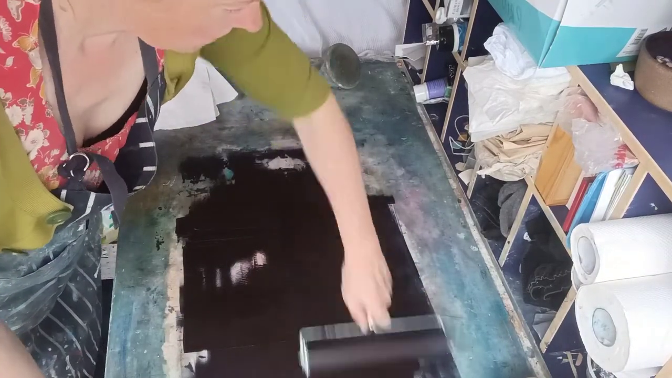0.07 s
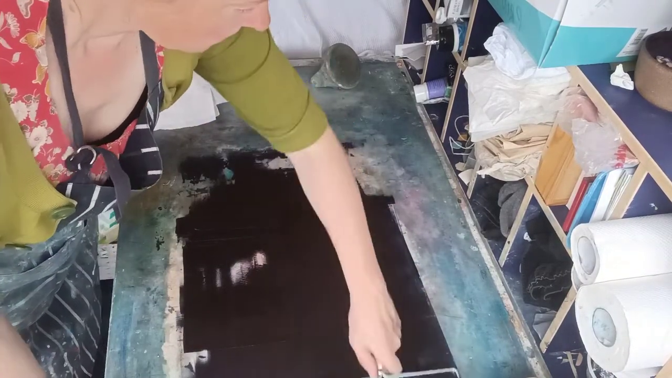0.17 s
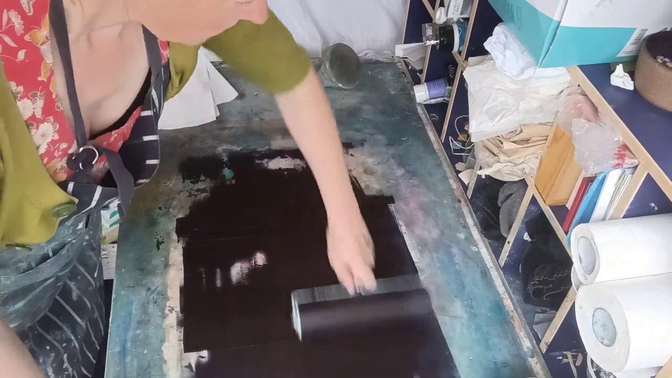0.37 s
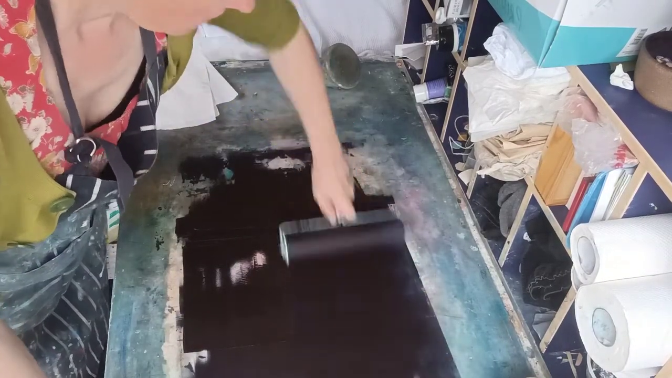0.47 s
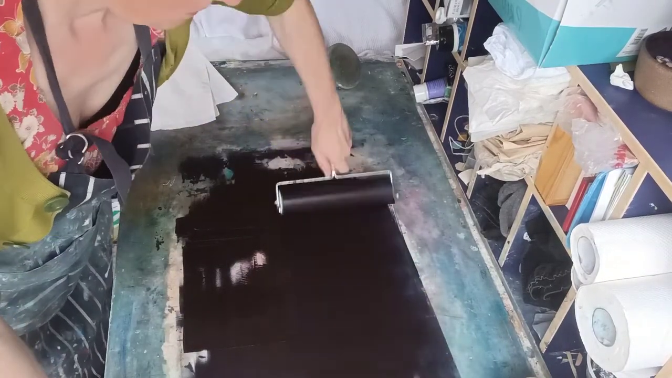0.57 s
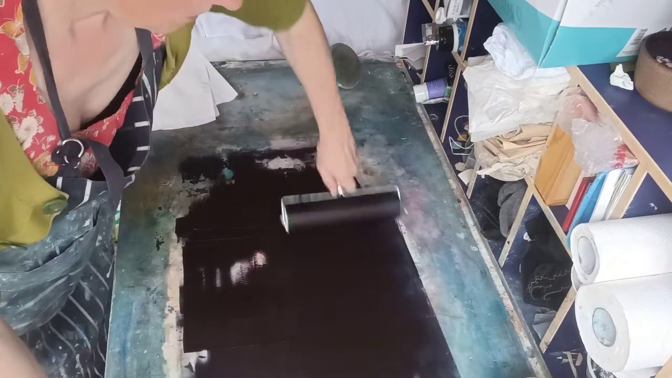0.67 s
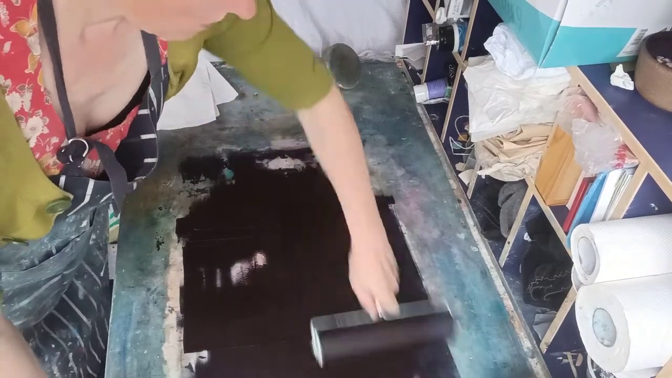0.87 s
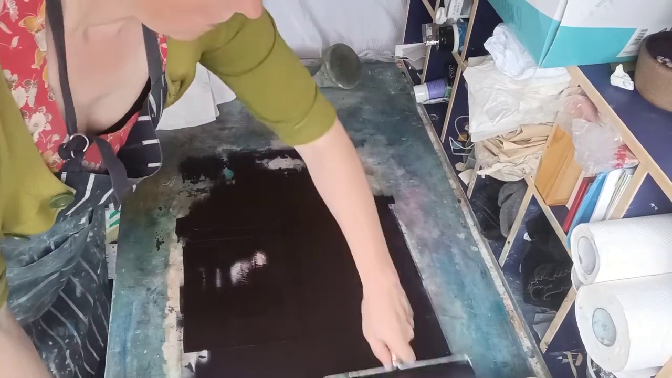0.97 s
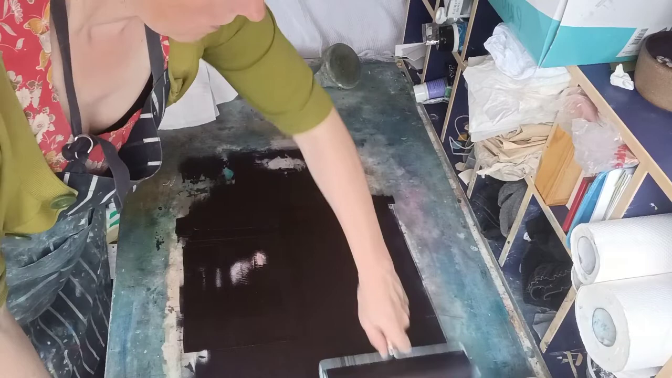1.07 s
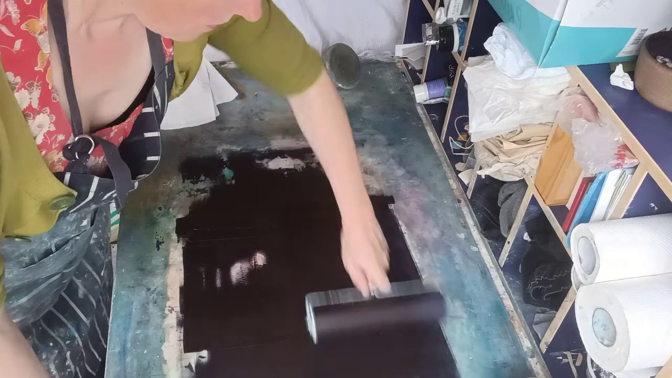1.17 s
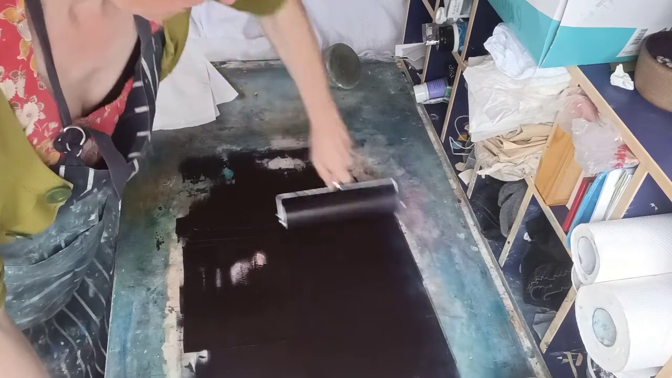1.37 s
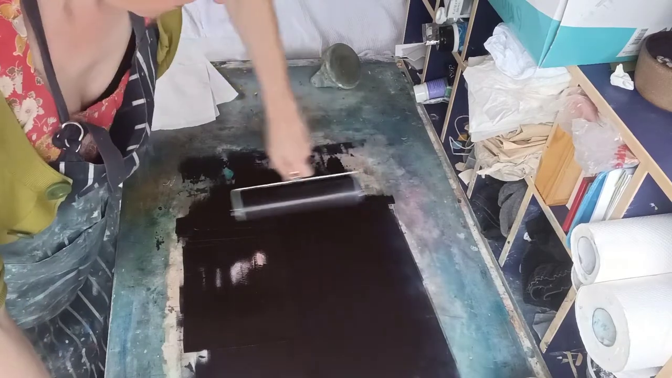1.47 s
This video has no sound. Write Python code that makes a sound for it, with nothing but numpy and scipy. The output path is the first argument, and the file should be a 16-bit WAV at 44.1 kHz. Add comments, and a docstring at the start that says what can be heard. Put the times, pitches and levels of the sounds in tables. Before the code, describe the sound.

The tail of a roller stroke on sticky ink fades by 0.1 s. Light axle clicks at 0.2 s begin a bright, crackling hiss lasting until about 0.5 s. After a tiny gap, the roller lands with a woody thud and rattle at 0.57 s, then hisses until 0.87 s. Another sizzling stroke runs from 1.0 to 1.3 s. Low table rumble and soft bumps follow each stroke; close, dry, small room.

```python
"""Hand roller on sticky ink

A hand roller works sticky ink back and forth over a slab on a table, close by in a small room.
Threads of ink snap in a bright hiss: dense random clicks over noise, coloured and shaped by stroke.
The table rumbles as filtered noise that follows roller speed, and rings in decaying modes when knocked.
The axle clicks in its frame as noise bursts; once the roller is lifted and set down with a thud."""
import sys
import numpy as np
from scipy import signal
from scipy.fft import rfft, irfft
from scipy.io import wavfile
from scipy.ndimage import uniform_filter1d

SR = 44100
rng = np.random.default_rng(int(sys.argv[2]) if len(sys.argv) > 2 else 0)


def log_audio(samples):
    """Write samples as a 16-bit WAV file to the path given in sys.argv[1]."""
    # one column per channel
    frames = np.atleast_2d(samples).T
    # limit to full scale, then quantise
    limited = np.clip(frames, -1, 1)
    pcm = np.round(limited * 32767).astype(np.int16)
    wavfile.write(sys.argv[1], SR, pcm)


N = 66150
T = np.arange(N) / SR


def amp(db):
    """Logarithmic level: decibels become an amplitude ratio."""
    return 10 ** (np.asarray(db) / 20)


def unit(x):
    """Normalization: scales a signal to rms 1."""
    return x / np.sqrt(np.mean(x ** 2) + 1e-20)


def colour(x, points):
    """Spectral shaping: weights each frequency by a curve drawn over log frequency, at rms 1."""
    hz, db = np.transpose(points)
    shape_db = np.interp(np.log(np.fft.rfftfreq(N, 1 / SR) + 1), np.log(hz), db)
    return unit(irfft(rfft(x) * amp(shape_db), N))


def pair(x, same):
    """Interchannel correlation: mixes two unrelated sounds into left and right of a given likeness."""
    likeness = np.clip(same, -.999, .999)
    mid = x[0] * np.sqrt((1 + likeness) / 2)
    side = x[1] * np.sqrt((1 - likeness) / 2)
    return np.array([mid + side, mid - side])


def noise():
    """White noise: equal power at all frequencies, in two unrelated channels."""
    return rng.standard_normal((2, N))


def patchy(x, patch_db, flicker_db):
    """Random modulation: uneven ink varies the level in patches of time and pitch, and as a whole."""
    spectrum = signal.stft(x, nperseg=256)[2]
    patches = uniform_filter1d(rng.standard_normal(spectrum.shape[1:]), size=3, axis=0)  # over pitch
    patches = unit(uniform_filter1d(patches, size=14, axis=1))  # over time
    flicker = unit(uniform_filter1d(rng.standard_normal(spectrum.shape[2]), size=2))
    varied = signal.istft(spectrum * amp(patch_db * patches + flicker_db * flicker))[1]
    return unit(varied[:, :N])


SNAPS_PER_S = 7600  # mean rate in each channel
SNAP_SPREAD_DB = -1  # scales the exponential spread of snap sizes
SNAP_SHARE = .6  # fraction of power in the separate snaps


def snaps():
    """Shot noise: breaking ink threads are a dense random click train over a smooth hiss of smaller ones."""
    size = amp(SNAP_SPREAD_DB * np.minimum(rng.exponential(1, (2, N)), 5))
    breaks = rng.random((2, N)) < SNAPS_PER_S / SR
    train = np.sign(noise()) * size * breaks
    return np.sqrt(SNAP_SHARE) * unit(train) + np.sqrt(1 - SNAP_SHARE) * noise()


# Level of the ink through each stroke, one list per stroke: start_s [s], hiss_db [dB], sizzle_db [dB]
INK_LEVELS = [
    [(0.0, -49.5, -49), (0.036, -54, -49), (0.052, -53, -59), (0.086, -83.5, -75), (0.1, -113, -106)],
    [(0.11, -83, -111), (0.146, -58, -62), (0.162, -57.5, -51), (0.194, -45, -46), (0.21, -41, -46),
     (0.228, -41, -39), (0.456, -41.5, -40.5), (0.478, -57, -48), (0.52, -114, -104)],
    [(0.555, -95, -106), (0.565, -52, -63), (0.571, -44.5, -65), (0.589, -52, -62.5), (0.621, -44, -42.5),
     (0.677, -47.5, -48), (0.687, -45, -41), (0.801, -44, -43), (0.851, -50.5, -50.5),
     (0.885, -71.5, -67.5), (0.91, -85, -103)],
    [(0.915, -87, -106), (0.957, -69.5, -67.5), (0.997, -47, -39.5), (1.055, -38, -39), (1.083, -46.5, -50),
     (1.119, -47, -48), (1.133, -40.5, -41), (1.193, -44, -43.5), (1.223, -41.5, -43), (1.267, -47.5, -48),
     (1.325, -103, -106)],
]
# Rolling strokes: start_s [s], length_s [s], rumble_db [dB], hiss_pan_db [dB, left minus right],
# direction [+1 toward the near edge, -1 away], rasp_db [dB over the hiss]
ROLLER_STROKES = [(-.25, 0.34, -41, 0.5, 1, 0.5), (.18, 0.35, -43.5, -2.5, -1, -6),
                  (.53, 0.36, -41, -0.3, 1, -1), (.99, 0.29, -43, -2, -1, -5.5)]
# Spectra of the snapping ink, from high hiss to lower rasp: pitch_hz [Hz], level_db [dB per Hz]
HISS_SPECTRUM = [(3000, -46.5), (6500, -13.5), (8200, -13), (9300, -1.5), (10100, 0.5), (11300, -5.5),
                 (12500, -10.5), (14000, -19)]
SIZZLE_SPECTRUM = [(9000, -46.5), (12000, -14), (13300, -12), (14300, -5.5), (15200, 9), (16000, -7.5)]
RASP_SPECTRUM = [(300, -26.5), (600, -6.5), (850, -11), (1050, -9), (1400, -1), (2000, -4), (2600, 0),
                 (3400, 0), (5000, 4), (6800, 3.5), (9000, -9), (16000, -0.5)]
HISS_SAME, RASP_SAME = 0.88, .05  # left-right likeness


def ink():
    """Direct and diffuse sound: correlated hiss and sizzle swell by stroke, a diffuse rasp follows the hiss."""
    s, hiss_db, sizzle_db = np.concatenate(INK_LEVELS).T
    middles = [row[0] + row[1] / 2 for row in ROLLER_STROKES]
    pan_db = np.interp(T, middles, [row[3] for row in ROLLER_STROKES])
    rasp_db = np.interp(T, middles, [row[5] for row in ROLLER_STROKES])
    hiss = colour(patchy(pair(snaps(), HISS_SAME), patch_db=1.5, flicker_db=0.55), HISS_SPECTRUM)
    sizzle = colour(patchy(pair(snaps(), HISS_SAME), patch_db=1.3, flicker_db=.7), SIZZLE_SPECTRUM)
    rasp = colour(patchy(pair(snaps(), RASP_SAME), patch_db=3.5, flicker_db=0.67), RASP_SPECTRUM)
    hiss_level = amp(np.interp(T, s, hiss_db))
    sizzle_level = amp(np.interp(T, s, sizzle_db))
    direct = hiss * hiss_level + sizzle * sizzle_level
    diffuse = rasp * hiss_level * amp(rasp_db)
    return direct * amp([pan_db / 2, -pan_db / 2]) + diffuse * amp([[.4], [-.3]])


# Spectra of the table's rumble, from low to high: pitch_hz [Hz], level_db [dB per Hz]
BOOM_SPECTRUM = [(30, -45.5), (55, -37), (72, -27), (92, 2.5), (125, 1.5), (165, 4), (210, -6.5),
                 (300, -34), (1000, -81.5)]
BODY_SPECTRUM = [(100, -44.5), (200, -17.5), (270, 5), (300, 4), (330, 4), (395, 2), (470, -11),
                 (700, -46.5), (2000, -70)]
GRIND_SPECTRUM = [(250, -35), (480, -8), (560, 1), (630, -2.5), (700, 0.5), (830, 4.5), (950, -14.5),
                  (1080, -11.5), (3000, -49.5)]
BOOM_LAW, BODY_LAW, GRIND_LAW = 1.1, 1.8, 2.8  # amplitude grows with this power of the speed
BOOM_DB, BODY_DB, GRIND_DB = -4.5, -7, -26.5  # relative to rumble_db; the grind at the far edge
NEAR_DB = 18.5  # rise of the grind from the far to the near edge
BOOM_SAME, BODY_SAME, GRIND_SAME = 0.97, .88, 0.4  # left-right likeness


def rolling():
    """Rolling excitation: the table booms, drones and grinds with roller speed, one arch per stroke."""
    boom = amp(BOOM_DB) * colour(pair(noise(), BOOM_SAME), BOOM_SPECTRUM)
    body = amp(BODY_DB) * colour(pair(noise(), BODY_SAME), BODY_SPECTRUM)
    grind = amp(GRIND_DB) * colour(pair(noise(), GRIND_SAME), GRIND_SPECTRUM)
    out = np.zeros((2, N))
    for start, length, db, _, direction, _ in ROLLER_STROKES:
        swing = np.pi * np.clip((T - start) / length, 0, 1)
        speed = abs(np.sin(swing))
        nearness = (1 - np.sign(direction) * np.cos(swing)) / 2  # 0 far edge, 1 near edge
        rumble = boom * speed ** BOOM_LAW + body * speed ** BODY_LAW
        rumble += grind * speed ** GRIND_LAW * amp(NEAR_DB * nearness)
        out += amp(db) * rumble
    return out


# Bumps of the roller over uneven ink: start_s [s], level_db [dB], contact_s [s]
INK_BUMPS = [(.0, -35, 0.0057), (0.05, -38.5, 0.0075), (.222, -41.5, .003), (0.358, -27, 0.0054),
             (0.378, -53, 0.0021), (0.464, -34.5, 0.0043), (0.53, -46, 0.0057), (0.605, -41, 0.0021),
             (.654, -23.5, 0.0059), (0.659, -26.5, 0.0051), (0.761, -29, 0.0036), (0.766, -29.5, 0.0052),
             (.868, -52.5, 0.006), (1.081, -41, .002), (1.103, -37, 0.0028), (1.193, -30.5, 0.0045),
             (1.229, -41.5, 0.0028), (1.264, -38.5, 0.007)]
# Modes of the slab and table: pitch_hz [Hz], level_db [dB], t60_s [s]
TABLE_MODES = [(97.75, -1.5, 0.14), (115, -4.5, .08), (158.7, -7, 0.11), (255, -3, .08), (309, -2.5, 0.049),
               (362, -7, 0.086), (684, -7, 0.038), (895, -15, .07)]
# Spectrum of the higher modes, which crowd together: pitch_hz [Hz], level_db [dB per Hz]
CROWDED_SPECTRUM = [(300, -35.5), (500, -18.5), (620, -4.5), (720, -11.5), (850, 12.5), (950, 0.5),
                    (1060, -4.5), (1350, 0.5), (2000, -9), (4000, -25)]
CROWDED_DB, CROWDED_T60_S, CROWDED_SAME = -2.5, 0.071, 1  # start level, decay, left-right likeness
# Set down again: one end lands, then the other, then it rebounds; delays in s after the landing
LANDING_S, OTHER_END_S, REBOUND_S = .5679, .006, .0182
FIRST_END_DB, OTHER_END_DB, REBOUND_DB, LANDING_CONTACT_S = -20, -14.5, -38.5, 0.0018


def knocks():
    """Modal response: soft pushes ring the table; the shorter the contact, the brighter the thud."""
    landing = [
        (LANDING_S, FIRST_END_DB, LANDING_CONTACT_S),
        (LANDING_S + OTHER_END_S, OTHER_END_DB, LANDING_CONTACT_S),
        (LANDING_S + REBOUND_S, REBOUND_DB, LANDING_CONTACT_S),
    ]
    push = np.zeros(N)
    for s, db, contact in INK_BUMPS + landing:
        bump = np.sin(np.pi * np.clip((T - s) / contact, 0, 1)) ** 2
        push += amp(db) * bump / (bump.sum() + 1e-9)  # equal impulse for any contact time
    ring = sum(amp(db - 60 * T / t60) * np.cos(2 * np.pi * hz * T) for hz, db, t60 in TABLE_MODES)
    crowd = colour(pair(noise(), CROWDED_SAME), CROWDED_SPECTRUM)
    crowd = crowd * amp(CROWDED_DB - 60 * T / CROWDED_T60_S)
    return signal.fftconvolve(push[None], ring + crowd, axes=1)[:, :N] * amp([[-.5], [.5]])


# Knocks of the axle in its frame: start_s [s], level_db [dB], rattle_t60_s [s],
# focus_hz [Hz, pitch favoured by the click], crack_db [dB over the rattle]
AXLE_CLICKS = [(.043, -51, 0.054, 6500, -14), (0.2061, -35, 0.035, 2580, 3), (0.2219, -33, 0.046, 6200, -8),
               (0.457, -52, 0.076, 2080, -21), (.524, -70, 0.14, 1570, -17), (0.5677, -41, 0.19, 3240, 9.5),
               (0.661, -54, 0.18, 3690, 18.5), (0.864, -59.5, 0.036, 2550, -9),
               (1.01, -42, 0.059, 2480, -23), (1.167, -44.5, 0.094, 4860, -6), (1.253, -53.5, .1, 2700, -6)]
# Spectrum of the frame: pitch_hz [Hz], level_db [dB per Hz]
FRAME_SPECTRUM = [(300, -37.5), (650, 2), (1000, -0.5), (1400, -0.5), (1900, 0.5), (2600, 4), (3400, -6),
                  (4500, 1), (6500, -1), (10000, 0.5), (16000, -13)]
CLICK_SAME = 0.16  # left-right likeness
CRACK_T60_S, FOCUS_DB = 0.014, 3.5  # decay of the crack; loss one octave from the favoured pitch


def clicks():
    """Two-stage decay: the loose axle hits the frame with a sharp crack and a longer rattle."""
    out = np.zeros((2, N))
    for s, db, t60, focus_hz, crack_db in AXLE_CLICKS:
        age = np.maximum(T - s, 0)
        rattle = amp(-60 * age / t60)
        crack = amp(crack_db - 60 * age / CRACK_T60_S)
        level = (T >= s) * (rattle + crack)
        spectrum = [(hz, gain - FOCUS_DB * np.log2(hz / focus_hz) ** 2) for hz, gain in FRAME_SPECTRUM]
        click = colour(level * pair(noise(), CLICK_SAME), spectrum)
        out += amp(db) * np.sqrt(np.mean(level ** 2)) * click  # restores the rms of the decay
    return out * amp([[-.8], [.8]])


# Spectrum of the reverberation: pitch_hz [Hz], level_db [dB per Hz]
ROOM_SPECTRUM = [(40, -26), (200, -19.5), (450, -12), (750, 0.5), (2000, -5.5), (6000, -13), (16000, -11.5)]
ROOM_DB, ROOM_T60_S = -5.5, 0.073


def room(x):
    """Reverberation: convolution with decaying noise gives the short echo of a cluttered room."""
    tail = colour(noise(), ROOM_SPECTRUM) * (T > .003) * amp(-60 * T / ROOM_T60_S)
    response = unit(tail) / np.sqrt(N)  # unit energy
    return amp(ROOM_DB) * signal.fftconvolve(x, response, axes=1)[:, :N]


# Spectrum of the quiet room: pitch_hz [Hz], level_db [dB per Hz]
FLOOR_SPECTRUM = [(25, 8.5), (50, -1), (95, -1.5), (200, -4.5), (500, -14), (1000, -18), (3000, -26.5),
                  (10000, -26.5), (16000, -27.5)]
FLOOR_DB = -70.5


def floor():
    """Background noise: steady, partly correlated noise, strongest in the bass."""
    return amp(FLOOR_DB) * colour(pair(noise(), same=0.53), FLOOR_SPECTRUM)


def scene():
    """Superposition: ink, table and frame add over a quiet room; only the hits reverberate."""
    hits = knocks() + clicks()
    return ink() + rolling() + hits + room(hits) + floor()


LOW_CUT_HZ, EDGE_HZ = 74, 15950  # bass cut and upper band limit


def record(dry):
    """Filtering and expansion: the microphone cuts deep bass, a suppressor lowers quiet moments, treble ends."""
    hz = np.fft.rfftfreq(2 * N, 1 / SR) + 1
    bass_cut = .03 + .97 / (1 + (LOW_CUT_HZ / hz) ** 8)
    heard = irfft(rfft(dry, 2 * N) * bass_cut)[:, :N]
    threshold_db, slope, depth_db = -60, .6, 6  # slope: dB of cut per dB below the threshold
    power = uniform_filter1d((heard ** 2).mean(0), size=700)  # over about 16 ms
    power_db = 10 * np.log10(abs(power) + 1e-14)
    gated = heard * amp(-np.clip(slope * (threshold_db - power_db), 0, depth_db))
    band_limit = signal.firwin(1023, EDGE_HZ, window=("kaiser", 9), fs=SR)
    return signal.oaconvolve(gated, band_limit[None], "same")


dry = scene()
out = record(dry)
log_audio(out)
```